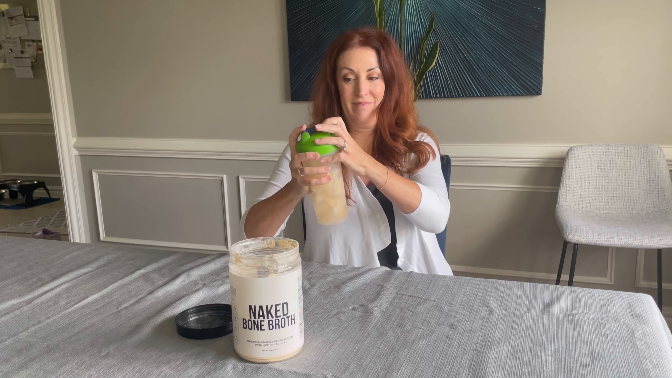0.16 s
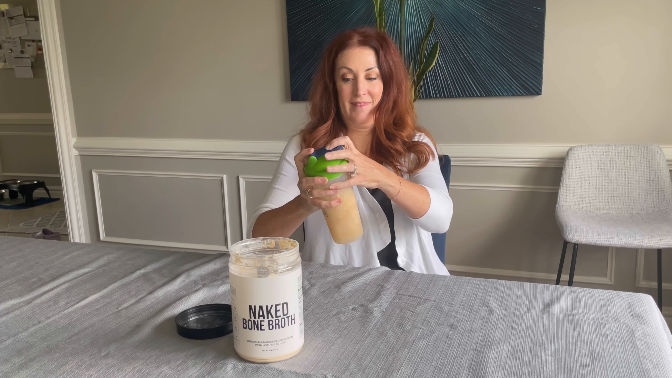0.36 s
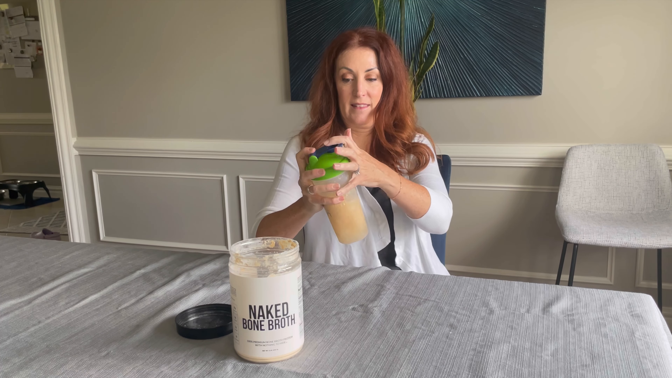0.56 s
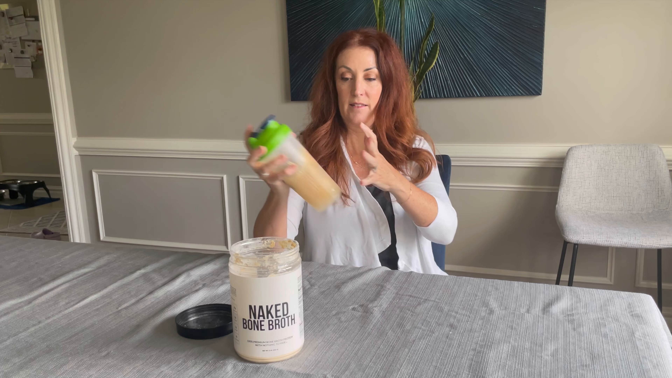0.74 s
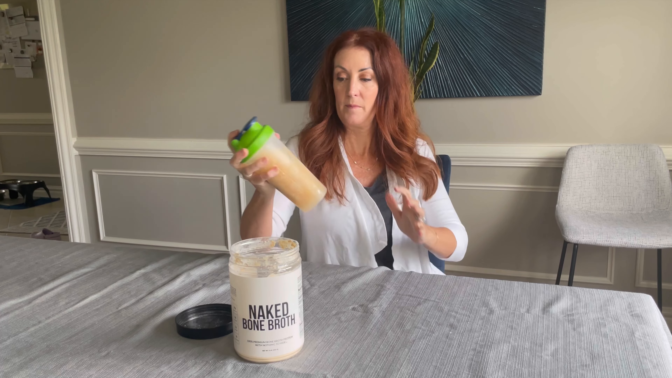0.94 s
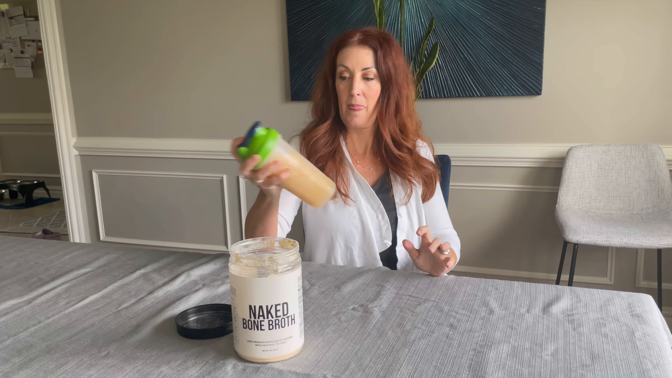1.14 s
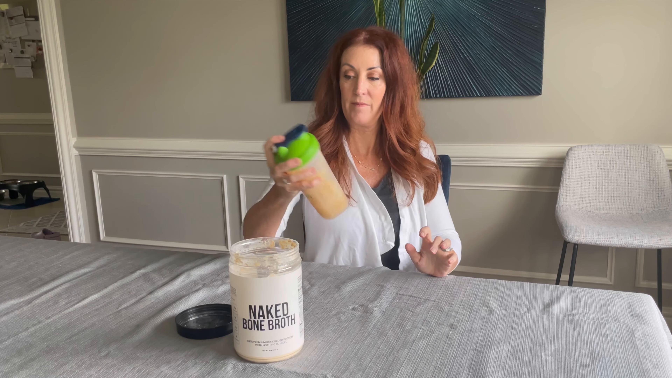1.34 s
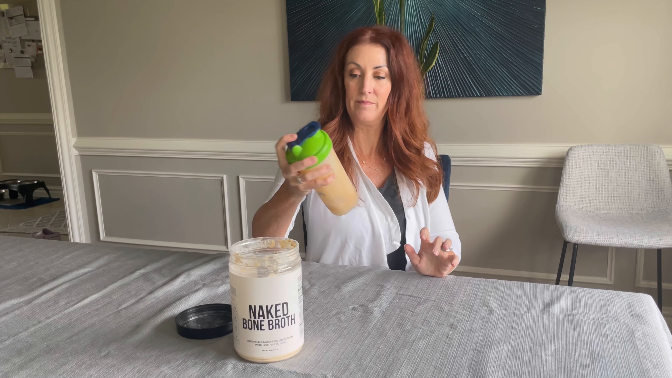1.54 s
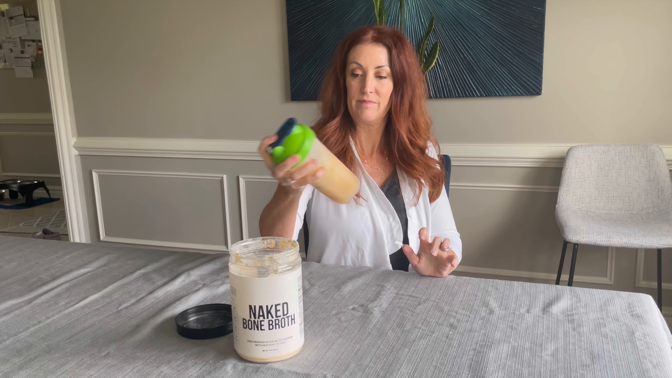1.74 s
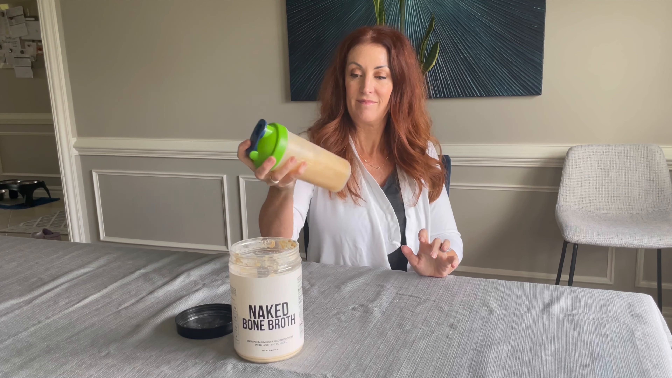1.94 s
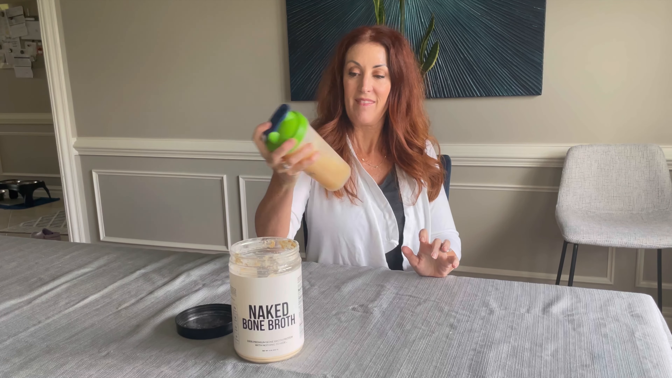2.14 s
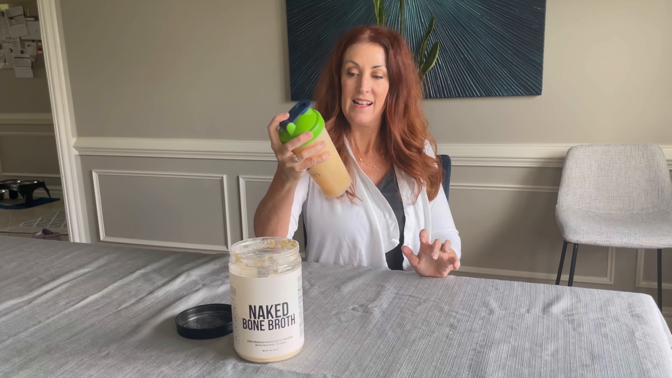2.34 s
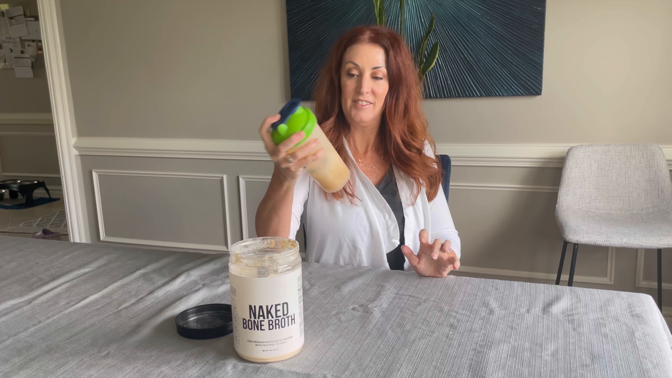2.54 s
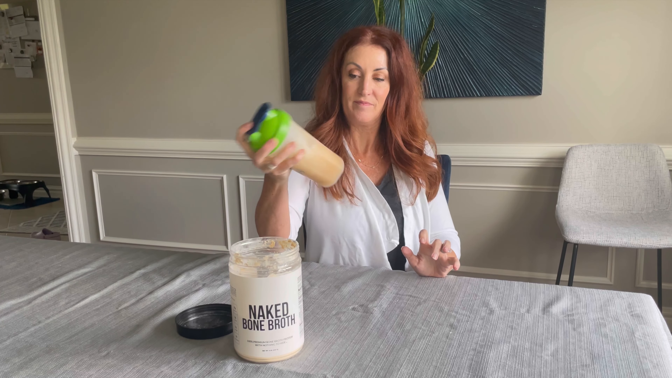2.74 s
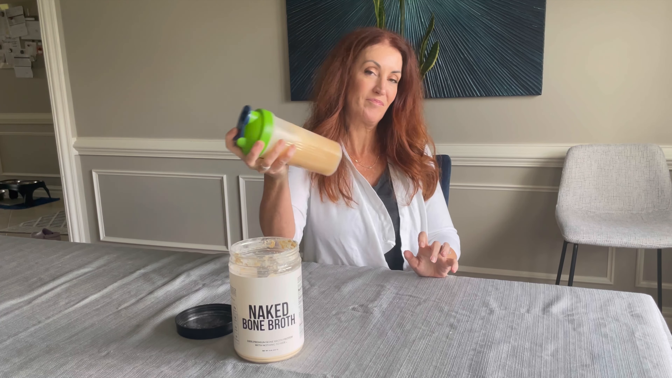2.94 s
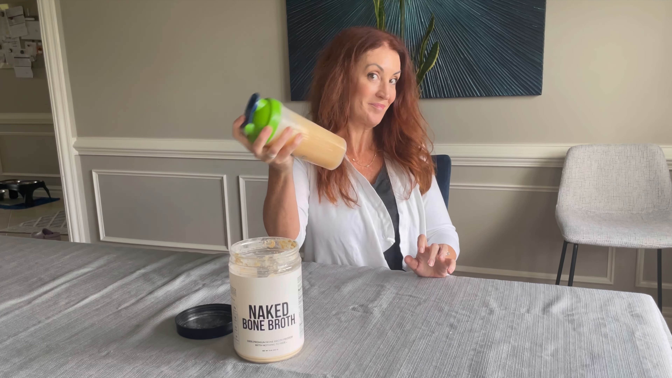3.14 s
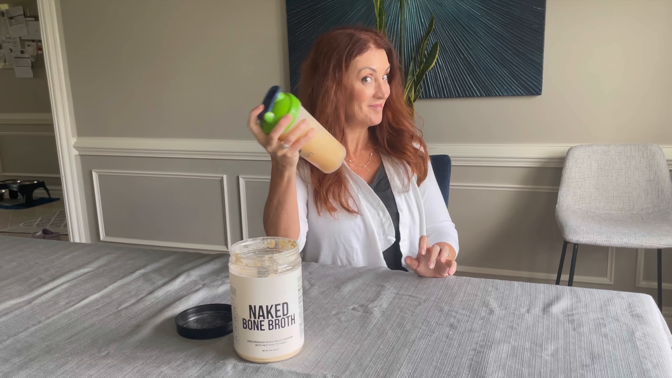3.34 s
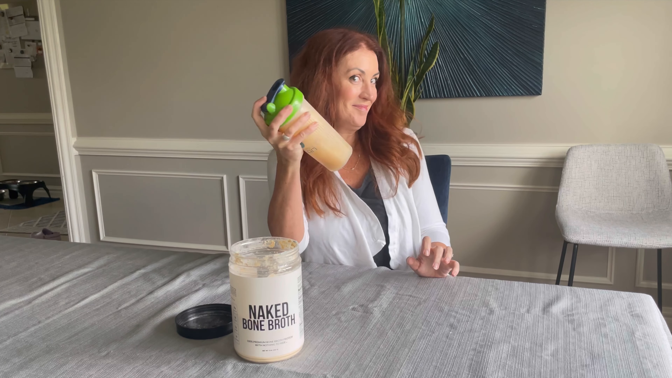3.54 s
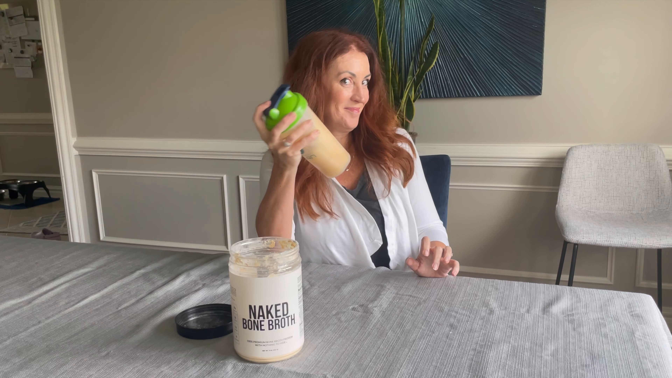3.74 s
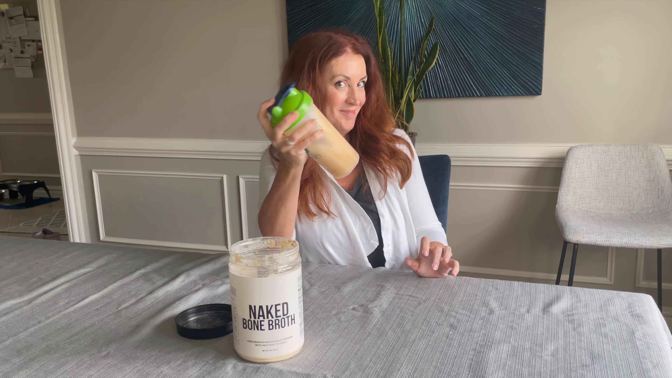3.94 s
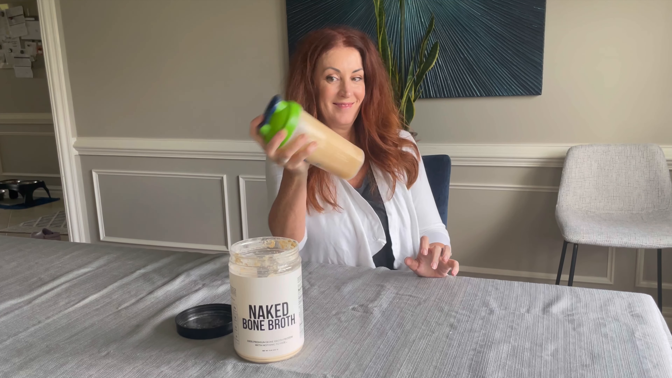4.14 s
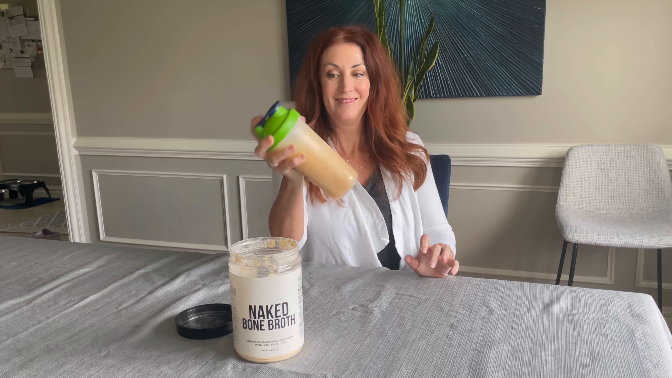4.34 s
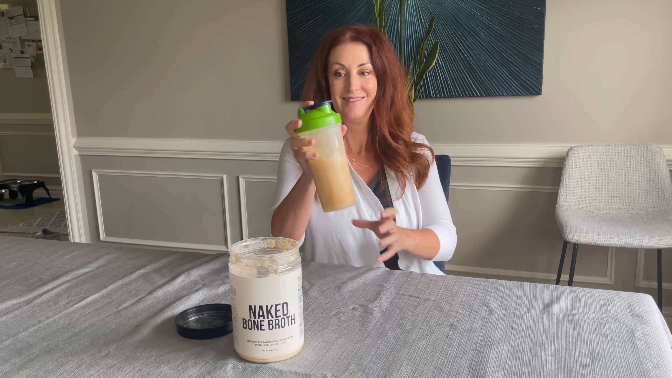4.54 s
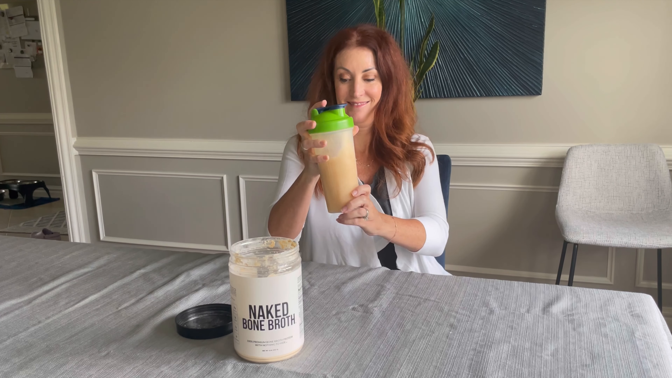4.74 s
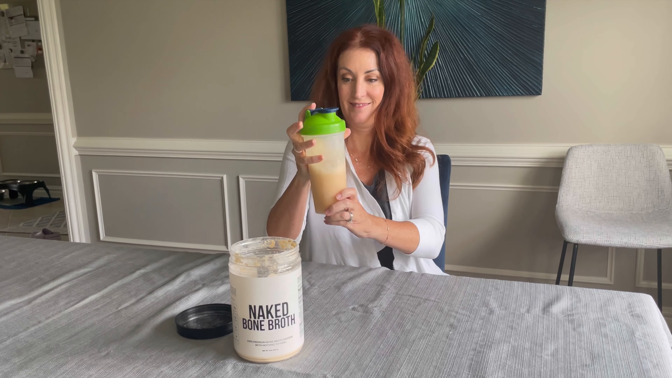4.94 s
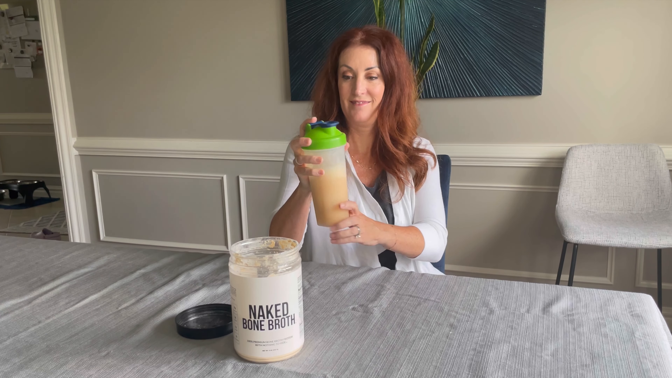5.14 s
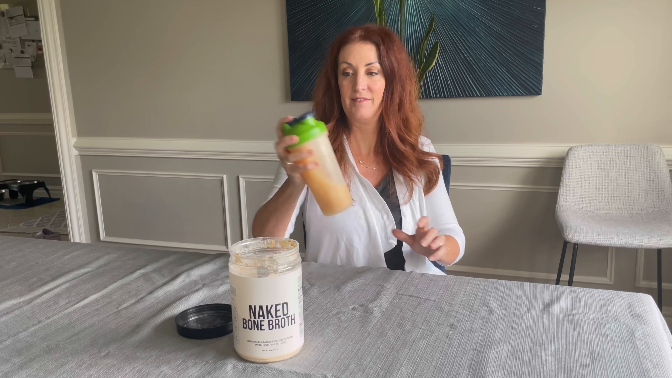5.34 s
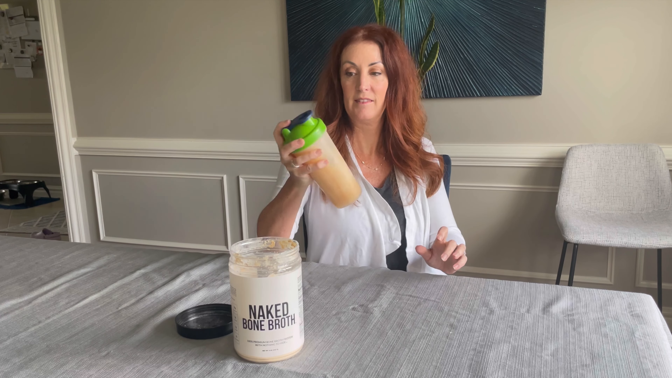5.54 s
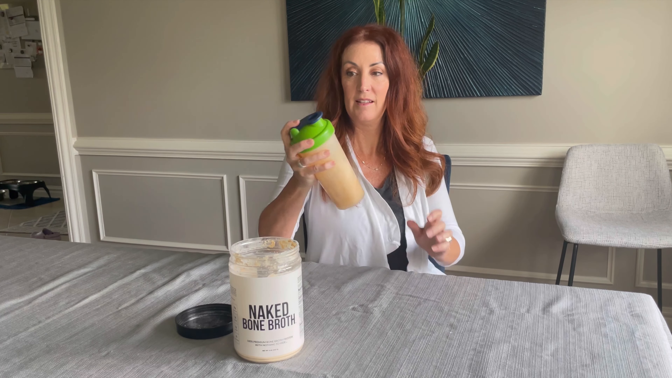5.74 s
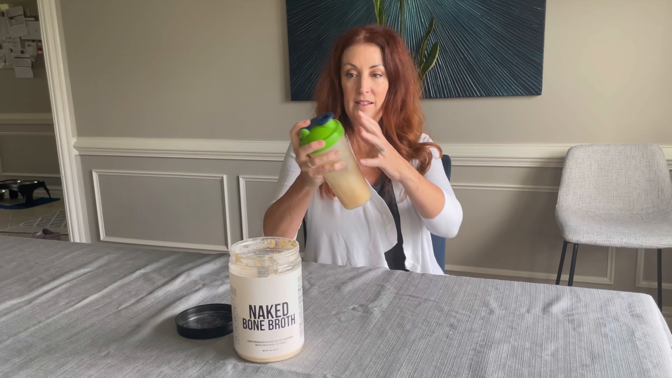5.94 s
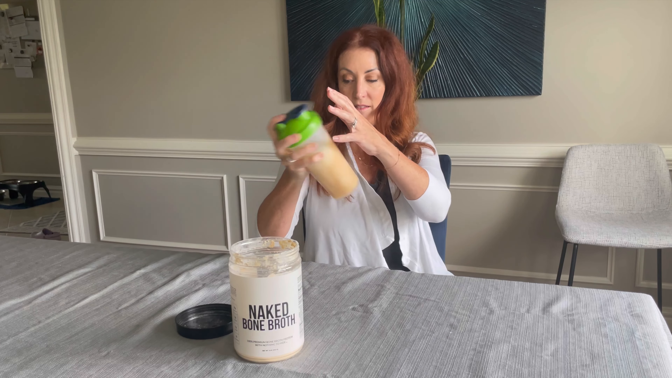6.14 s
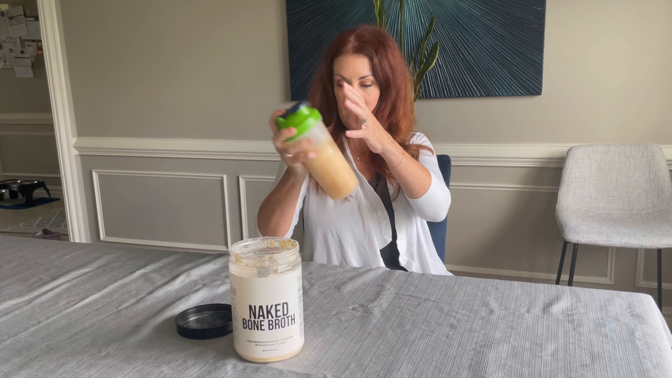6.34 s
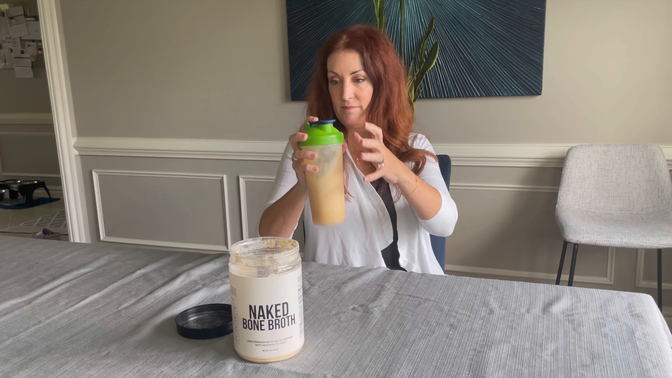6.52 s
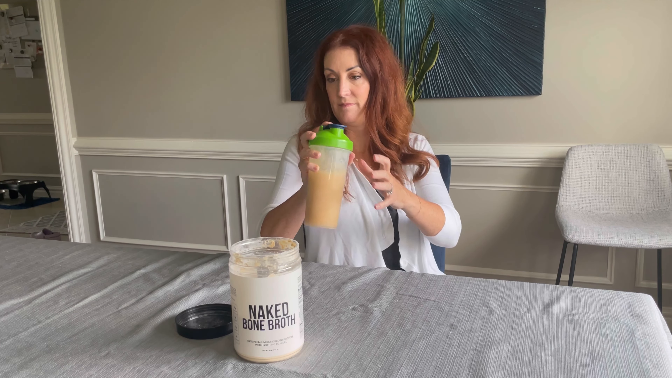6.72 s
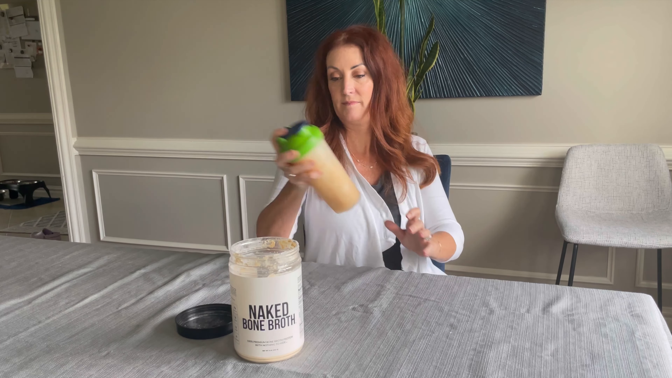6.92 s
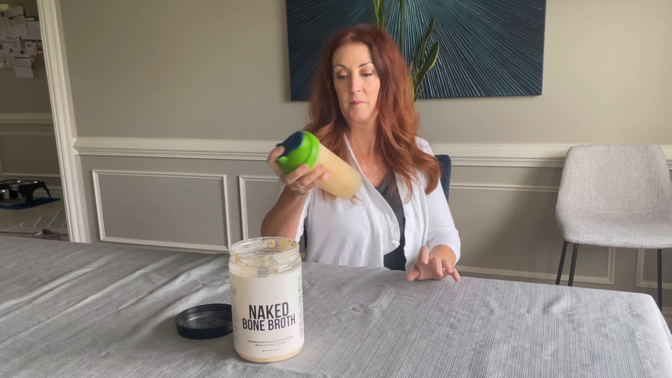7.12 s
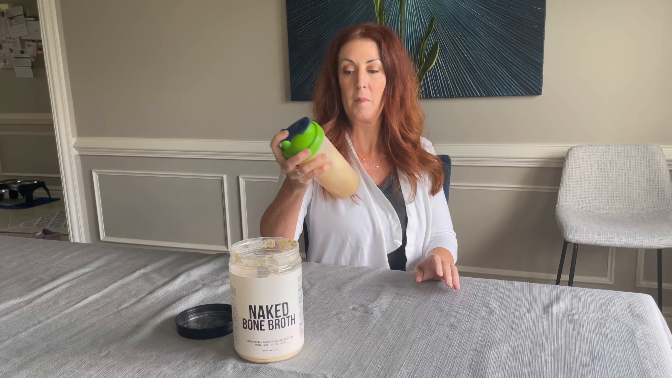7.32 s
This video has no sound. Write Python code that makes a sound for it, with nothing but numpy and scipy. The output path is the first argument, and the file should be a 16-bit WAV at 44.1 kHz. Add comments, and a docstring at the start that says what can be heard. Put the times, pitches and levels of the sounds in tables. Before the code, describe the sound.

Ice cubes rattle and knock inside a plastic bottle of sloshing liquid, shaken hard by hand in a room.

```python
"""Ice and liquid in a plastic bottle, shaken by hand in a living room, a metre from a phone's microphones.
Over a low ventilation rumble, a first burst of clatter cuts out at 0.41 s and the sound fades back in.
From about 1 s the shaking is steady: cubes knock the bottle wall for a few cycles and crack on each other,
the liquid sloshes and gurgles, and the room's hard walls throw every knock back. The shaking nearly rests
around 5 s, picks up again, eases, and ends in a last hard flurry at 7 s."""
import sys
import numpy as np
from scipy import signal
from scipy.fft import rfft, irfft, next_fast_len
from scipy.io import wavfile
from scipy.ndimage import uniform_filter1d

SR = 44100
rng = np.random.default_rng(int(sys.argv[2]) if len(sys.argv) > 2 else 0)


def digitize_waveform(pressure):
    """Quantize a signal to 16-bit integers and store it at the path in sys.argv[1].

    Rows of a 2-D input are taken as channels; values are limited to [-1, 1].
    """
    field = np.atleast_2d(pressure).T
    bounded = np.clip(field, -1, 1)
    quanta = np.round(bounded * 32767).astype(np.int16)
    wavfile.write(sys.argv[1], SR, quanta)


N = 325458
TIME = np.arange(N) / SR
FFT_SIZE = next_fast_len(N + SR) // 2 * 2
HZ = np.fft.rfftfreq(FFT_SIZE, 1 / SR)


def gain_of(db):
    """Decibels to an amplitude factor."""
    return 10 ** (np.asarray(db) / 20)


def unit_rms(x):
    """Scales x to rms 1."""
    return x / np.sqrt(np.mean(x ** 2) + 1e-20)


def curve_at(points, hz):
    """Reads a table on a log-frequency axis."""
    f, value = np.transpose(points)
    return np.interp(np.log(hz + 1), np.log(f + 1), value)


def coloured(x, spectrum):
    """Gives x a spectrum, at rms 1."""
    return unit_rms(irfft(rfft(x, FFT_SIZE) * gain_of(curve_at(spectrum, HZ)))[:N])


def clicks(per_s, spread_db):
    """Clicks at random moments, of random sign; a few are large."""
    size, sign, occurs = rng.random((N, 3)).T
    size_db = spread_db * np.minimum(-np.log(size + 1e-9), 4)
    return gain_of(size_db) * np.sign(sign - .5) * (occurs < per_s / SR)


def wander(step=2600):
    """A random drift at rms 1, with a new target every step samples."""
    targets = rng.standard_normal(N // step + 2)
    return unit_rms(np.interp(np.arange(N), np.arange(0, N + step, step), targets))


# Diffuse room sound at the two microphones: (frequency [Hz], left-right coherence [0-1])
COHERENCE = [(50, 0.87), (250, 0.82), (700, 0.02), (3000, 0.015), (9000, 0.026), (12000, 0.085),
             (14000, 0.34)]
def diffuse_pair(spectra):
    """Two unrelated spectra become a left-right pair, most alike in the bass."""
    left, other = spectra
    alike = np.clip(curve_at(COHERENCE, HZ), 0, 1)
    return np.array([left, alike * left + np.sqrt(1 - alike ** 2) * other])


# Room tone of the living room: (frequency [Hz], relative level [dB])
RUMBLE_SPECTRUM = [(15, -76.5), (25, -45), (49, 2), (74, 2), (92, -32), (114, -2.5), (217, -11.5),
                   (263, -7), (405, -14), (796, -26), (1940, -22), (2480, -77), (16000, -65)]
def ventilation(level_db=-54.5):
    """Steady low ventilation noise, arriving from all around."""
    noise = diffuse_pair(rfft(rng.standard_normal((2, N)), FFT_SIZE))
    rumble = irfft(noise * gain_of(curve_at(RUMBLE_SPECTRUM, HZ)))[:, :N]
    return gain_of(level_db) * unit_rms(rumble)


def low_bump(at_s=3.155, level_db=-39, hz=58, width_s=.022):
    """One soft bump, a few cycles of bass."""
    t = TIME - at_s
    return gain_of(level_db) * np.exp(-(t / width_s) ** 2) * np.sin(2 * np.pi * hz * t)


# Early reflections off the table and the walls: (delay [s], level [dB])
ECHOES = [(.0055, -7), (.0085, -11), (.021, -15)]
# Reverberation of the living room: (frequency [Hz], time to fall 60 dB [s])
ROOM_DECAY = [(300, 0.44), (1500, 0.51), (4000, 0.32), (9000, 0.21), (15000, 0.073)]
def room(x, places, tail_db=-5.5):
    """Direct sound, echoes and a sparse tail; each place of the moving bottle has its own reflections."""
    paths = 2 * places
    taps = np.zeros((paths, SR))
    at = np.arange(400, SR - 20, 20) + rng.integers(0, 20, (paths, (SR - 401) // 20))
    np.put_along_axis(taps, at, rng.choice([-1., 1.], at.shape), 1)
    hz, t, spectra = signal.stft(taps, SR, nperseg=256)
    decay = gain_of(-60 * t / curve_at(ROOM_DECAY, hz)[:, None])
    response = signal.istft(spectra * decay, SR, nperseg=256)[1]
    response *= gain_of(tail_db) / np.linalg.norm(response[0])
    for s, db in ECHOES:
        response[np.arange(paths), round(s * SR) + rng.integers(-30, 30, paths)] += gain_of(db)
    place = (np.arange(N) // 1000) % places  # the places take turns of 23 ms
    wet = sum(rfft(x * (place == k), FFT_SIZE) * rfft(response[2 * k:2 * k + 2], FFT_SIZE)
              for k in range(places))
    dulled = diffuse_pair(wet) / np.sqrt(1 + (HZ / 20000) ** 2)
    return x + irfft(dulled)[:, :N]


# The hand's shaking, first burst and the rest: (time [s], effort [dB], splash relative to effort [dB])
SHAKING = [
    [(0.0, -30.5, -17.5), (0.1, -37.5, -12), (0.41, -44.5, -16)],
    [(0.41, -46, -3), (0.62, -56, -24), (0.86, -45, -16), (1.05, -37.5, -3.5), (1.6, -38.5, -13),
     (1.8, -35, -9.5), (2.43, -35.5, -3), (3.21, -37.5, -9.5), (4.08, -36, -3.5), (4.45, -44.5, -2.5),
     (4.65, -53, -15), (4.95, -59, -14), (5.24, -64.5, -26), (5.33, -48, -22), (5.4, -51, -14),
     (5.415, -43, 4), (5.57, -37.5, -22), (5.73, -38, -4.5), (6.25, -42.5, -3), (6.6, -47.5, -5),
     (6.86, -52.5, -24), (6.93, -40.5, -23), (7.03, -53, 4), (7.09, -38.5, 7.5), (7.38, -35, -11.5)],
]
def shaking():
    """How hard the bottle is shaken and how brightly it splashes, in dB for every sample."""
    times, *columns = np.transpose(SHAKING[0] + SHAKING[1])
    return [np.interp(TIME, times, column) for column in columns]


def surge(blows, settle_s=.031, share=.31):
    """The contents surge after each blow and settle in the gaps: a swing of the effort in dB."""
    pole = np.exp(-1 / (settle_s * SR))
    power = signal.lfilter([1 - pole], [1, -pole], blows ** 2)
    power_db = np.maximum(10 * np.log10(power + 1e-9), -70)
    return share * (power_db - uniform_filter1d(power_db, SR // 2))


# The liquid, heard through the bottle wall: (frequency [Hz], relative level [dB])
SLOSH_SPECTRUM = [(350, -58), (600, -11.5), (1110, -4), (1800, 5.5), (2310, 0.5), (2780, 1), (3330, -2),
                  (5660, -19.5), (6000, -1), (7800, -65), (13200, -120)]
def slosh(effort_db):
    """A fizz whose resonances shift as the liquid runs along the bottle."""
    fizz = np.zeros(N)
    for shift in (.93, 1, 1.06):
        spectrum = np.multiply(SLOSH_SPECTRUM, [shift, 1])
        fizz += coloured(clicks(per_s=1200, spread_db=4.63), spectrum) * gain_of(3.8 * wander())
    return gain_of(effort_db - 2) * unit_rms(fizz)


# Droplets inside the bottle: (frequency [Hz], relative level [dB])
SPLASH_SPECTRUM = [(2000, -22.5), (3500, 0.5), (5500, -2), (7600, 0), (9000, -7), (10500, -19),
                   (13500, -13), (15600, -13)]
def splash(level_db):
    """Thousands of droplets a second merge into a bright hiss."""
    return gain_of(level_db) * coloured(clicks(per_s=4000, spread_db=5), SPLASH_SPECTRUM)


def bubble(hz):
    """A pocket of air rings for a few cycles, gliding upward."""
    t = np.arange(1200) / SR
    return np.sin(2 * np.pi * hz * t * (1 + 10 * t)) * np.exp(-t * hz / 4.9) * (1 - np.exp(-t / .0001))


def gurgle(effort_db):
    """Small bubbles of twelve sizes ring at random moments."""
    bubbles = sum(signal.oaconvolve(clicks(per_s=40, spread_db=3), bubble(hz))[:N]
                  for hz in np.geomspace(350, 900, 12))
    return gain_of(effort_db - 16) * unit_rms(bubbles)


# Glugs that stand out at a metre: (time [s], level [dB], pitch [Hz])
GLUGS = [(0.111, -52, 474), (1.064, -39.5, 620), (1.431, -37, 693), (1.978, -37, 475), (2.55, -33.5, 523),
         (2.948, -31.5, 523), (3.062, -35.5, 466), (3.102, -37.5, 677), (3.593, -39.5, 410),
         (4.354, -43, 485), (5.696, -37, 546), (5.763, -39, 438), (5.827, -35.5, 457), (7.0, -34.5, 482),
         (7.048, -37, 490), (7.193, -36.5, 371), (7.267, -44, 390)]
def glugs():
    """Single pockets of trapped air ring with a ragged level."""
    out = np.zeros(N + 1200)
    for s, db, hz in GLUGS:
        ragged = 1 + 2.5 * uniform_filter1d(rng.standard_normal(1200), size=40)
        out[round(s * SR):][:1200] += gain_of(db) * bubble(hz) * ragged
    return out[:N]


# Bursts of splashing liquid: (start [s], length [s], level [dB])
RUSHES = [(0.058, 0.094, -37.5), (1.702, 0.053, -30), (5.534, 0.12, -32.5), (5.626, 0.19, -39),
          (5.833, 0.074, -31.5), (7.062, 0.19, -29.5)]
# Their grains: (frequency [Hz], relative level [dB])
RUSH_SPECTRUM = [(1200, -25), (2300, -9), (2900, -4), (3800, -2.5), (4800, -12.5), (7500, -9), (9500, -32)]
def splash_bursts():
    """The liquid splashes in bursts: dense grains that swell fast and die away."""
    swell = np.zeros(N)
    for start, length, db in RUSHES:
        progress = np.clip((TIME - start) / length, 0, 1)
        swell += gain_of(db) * np.sin(np.pi * progress ** .4)
    return swell * coloured(clicks(per_s=4000, spread_db=2.3), RUSH_SPECTRUM)


# Dry cracks from inside the bottle: (time [s], level [dB])
CRACKS = [(0.0588, -33), (0.072, -19.5), (0.079, -26), (0.2706, -18), (0.298, -21), (0.3486, -27),
          (0.4775, -36), (0.5355, -45), (0.6115, -49), (0.675, -38), (0.7505, -27), (0.9597, -27),
          (1.1368, -29), (1.16, -23), (1.182, -15), (1.288, -19), (1.338, -17), (1.4626, -28), (1.566, -29),
          (1.67, -19), (1.828, -22), (1.9385, -18.5), (2.002, -17), (2.0865, -30), (2.142, -14),
          (2.2428, -36), (2.2715, -26), (2.3107, -11), (2.3875, -28), (2.563, -27), (2.648, -11.5),
          (2.747, -32), (2.819, -18), (2.9125, -19), (2.9228, -25), (2.9473, -12), (2.978, -27),
          (3.101, -17), (3.17, -16.5), (3.291, -22), (3.32, -27), (3.4481, -22), (3.4606, -16),
          (3.539, -9.5), (3.6043, -18), (3.634, -11), (3.687, -18), (3.809, -19), (3.8574, -15),
          (3.9822, -10), (4.061, -13), (4.09, -15), (4.1921, -10), (4.349, -16.5), (4.559, -25),
          (4.907, -43), (5.095, -52), (5.408, -20.5), (5.54, -11.5), (5.6135, -15), (5.6342, -15),
          (5.698, -16), (5.8186, -20), (5.999, -16), (6.054, -18), (6.1873, -20), (6.1984, -12),
          (6.363, -21), (6.4165, -27), (6.5915, -27), (6.6065, -33), (6.623, -24), (6.721, -37),
          (6.7675, -30), (6.882, -37), (6.924, -31), (6.944, -22), (7.009, -23), (7.0511, -5), (7.275, -14)]
def ice_cracks():
    """Ice hits ice: a wide snap of noise with a brief fizz after it."""
    out = np.zeros(N + 1500)
    t = np.arange(1500) / SR
    envelope = np.exp(-t / .00028) + gain_of(-28) * np.exp(-t / .032)
    for s, db in CRACKS:
        snap = rng.standard_normal(1500) * envelope
        out[round(s * SR):][:1500] += gain_of(db) * snap / abs(snap).max()
    return signal.sosfilt(signal.butter(1, [2000, 12500], "band", fs=SR, output="sos"), out)[:N]


# Modes of the plastic wall: (frequency [Hz], relative level [dB], time to fall 60 dB [s])
WALL_MODES = [(1299, 9, 0.033), (1780, 28.5, 0.0047), (2250, 26.5, 0.0064), (2700, 27.5, 0.0084),
              (3728, 22, 0.011), (4015, 26.5, 0.0088)]
def knock(blow_db, patch_hz, spray_db, chance, hard_db=-16, rebound_db=-14):
    """One blow: wall modes near the struck patch's pitch ring most, the cube rebounds, spray hisses."""
    lasting = min(gain_of(.2 * (blow_db - hard_db)), 1)  # soft taps die sooner
    t = np.arange(400) / SR
    ring = np.zeros(len(t))
    for (hz, db, t60), detune in zip(WALL_MODES, chance):
        off_pitch_db = -28 * lasting * abs(np.log2(hz / patch_hz))
        envelope = gain_of(db + off_pitch_db - 60 * t / t60 / lasting)
        ring += envelope * np.sin(2 * np.pi * hz * (1 + .04 * (detune - .5)) * t)
    ring *= 1 - np.exp(-(t / .00055) ** 2)  # the contact builds up
    rebound_s = .004 + .046 * chance[8:20] ** 1.5
    rebound_size = gain_of(rebound_db - 200 * rebound_s) * 2 * (chance[20:32] - .5)
    contacts = np.zeros(2600)
    contacts[0] = 1
    contacts[(rebound_s * SR).astype(int)] = rebound_size
    blow = np.convolve(ring / abs(ring).max(), contacts)
    spray_band = signal.butter(2, [3900, 8600], "band", fs=SR, output="sos")
    spray = unit_rms(signal.sosfilt(spray_band, rng.standard_normal(len(blow))))
    spurts = gain_of(-5) * np.convolve(np.exp(-t / .001), abs(contacts))
    trail = gain_of(-19) * np.exp(-np.arange(len(blow)) / SR / .022)
    return blow + gain_of(spray_db) * spray * (spurts + trail)


def clatter(effort_db, cubes=12):
    """Small cubes tick everywhere on the wall, as hard as the shaking."""
    out = np.zeros(N)
    for chance in rng.random((cubes, 33)):
        hits = clicks(per_s=14, spread_db=4)
        tick = knock(blow_db=-30, patch_hz=1400 * 4.5 ** chance[32], spray_db=0, chance=chance)
        out += signal.oaconvolve(hits, tick)[:N]
    return gain_of(effort_db - 13) * unit_rms(out)


# Foreground knocks at a metre: (time [s], level [dB], patch pitch [Hz], spray relative to knock [dB])
KNOCKS = [(0.077, -37, 2490, 9), (0.0993, -28, 1920, -9), (0.1095, -14.5, 1660, -26),
          (0.2138, -27, 2150, -1), (0.293, -23, 1870, -5), (0.2975, -34, 2200, -16),
          (0.349, -20, 1860, -6.5), (0.4326, -49, 2190, 6), (0.476, -41, 2090, -6),
          (0.5353, -28, 2000, -31), (0.644, -34, 2060, -23), (0.6752, -29.5, 3200, -8),
          (0.805, -40, 1890, 5), (0.8262, -41, 1760, 12), (0.85, -29, 2700, -12), (0.904, -22.5, 1890, -10),
          (0.9334, -20.5, 2260, -8), (0.9984, -24, 2220, 5.5), (1.1834, -15, 2490, -1.5),
          (1.188, -20, 2600, -15), (1.338, -19, 1940, -3.5), (1.432, -18.5, 1950, -25),
          (1.458, -23, 1900, -13), (1.4875, -20, 1960, -5), (1.521, -23, 1760, -0.5),
          (1.5663, -20.5, 2080, -3.5), (1.613, -18.5, 1870, -8), (1.6361, -22, 1610, -4),
          (1.6733, -4.5, 2520, -4), (1.686, -9, 2670, -21), (1.7945, -18, 1700, -7),
          (1.828, -20.5, 2100, 3), (1.843, -16, 2700, -31.5), (1.861, -20, 2700, -14),
          (1.882, -14.5, 2300, -9), (1.942, -12.5, 1920, -3), (2.003, -8.5, 2380, -16),
          (2.0459, -18, 1770, -30), (2.1137, -21.5, 2130, 6.5), (2.244, -17, 1830, -1.5),
          (2.255, -17.5, 2120, -6), (2.29, -17.5, 1780, -1.5), (2.309, -17, 1740, -6),
          (2.311, -15, 2750, -7), (2.327, -14.5, 2750, -22), (2.351, -23, 2860, -9),
          (2.398, -16.5, 2400, 0.5), (2.4405, -15.5, 1720, -2), (2.4851, -16.5, 2710, -3),
          (2.514, -12.5, 2700, -22), (2.518, -25, 2700, -20), (2.5695, -17.5, 1900, 0.5),
          (2.581, -18, 2250, -10), (2.6036, -18, 1580, -1), (2.66, -19.5, 2720, -24),
          (2.677, -17, 2210, -4), (2.7479, -12.5, 2060, -4), (2.7967, -20, 1550, -4),
          (2.816, -24, 2250, -1), (2.8369, -6, 2550, -17), (2.912, -16, 2250, 1.5),
          (2.924, -15.5, 1750, -28), (2.9764, -19.5, 3070, 3.5), (2.9853, -19, 1720, -10),
          (3.0096, -17.5, 2770, -21), (3.05, -17.5, 1840, -6), (3.1016, -14, 1660, -2),
          (3.1192, -20, 1700, -8), (3.1871, -11.5, 2680, -12), (3.292, -20, 1430, 0),
          (3.319, -18, 1960, -2.5), (3.328, -18.5, 1630, -16), (3.359, -14.5, 2680, -10),
          (3.3873, -16, 1760, -11), (3.462, -16.5, 1540, -3), (3.5396, -20, 2450, 0.5),
          (3.607, -20, 1780, -4), (3.632, -18.5, 1960, 0), (3.684, -23.5, 1900, 7.5),
          (3.7551, -14.5, 1720, -31), (3.859, -12.5, 2590, -1.5), (3.8666, -12, 2700, -1),
          (3.9, -15, 2720, -28), (3.927, -14.5, 2820, -10), (3.9826, -17, 1970, -3), (4.0052, -20, 1750, 0),
          (4.0253, -17.5, 1630, 0.5), (4.0859, -21.5, 2500, 3), (4.141, -20, 1920, 1),
          (4.1756, -22.5, 3000, -5), (4.2482, -20.5, 2000, -29), (4.3518, -19.5, 2050, -6),
          (4.377, -36, 1780, -5), (4.539, -34, 1890, -22), (4.5572, -23, 2570, 0),
          (4.6003, -23.5, 2120, -2), (4.653, -32, 2200, -5), (4.6995, -38, 3700, -7),
          (4.731, -32.5, 2370, -2.5), (4.748, -46, 1660, -15), (4.81, -45, 2520, -12),
          (4.855, -40, 2320, -6), (4.892, -38, 1720, -3), (4.908, -35.5, 2880, -1),
          (4.9435, -36.5, 2250, -6), (5.01, -48, 1960, -22), (5.0778, -53, 2500, -20),
          (5.095, -39.5, 2800, -3.5), (5.2776, -39, 1800, -37), (5.3028, -37, 1860, -5),
          (5.334, -29, 1860, -6.5), (5.4102, -21.5, 2040, -1.5), (5.4252, -21, 2450, -11),
          (5.5275, -17, 2750, -10), (5.538, -10.5, 2900, -15), (5.6405, -16, 3030, 0),
          (5.673, -19, 1840, -4), (5.71, -14, 3140, -7), (5.8214, -16, 2060, 1), (5.8437, -17, 1880, -22),
          (5.899, -16.5, 3350, -2), (5.915, -18, 3130, -2), (5.9986, -19.5, 2240, 2),
          (6.054, -23.5, 2250, 0), (6.1458, -23, 2600, -19), (6.1863, -23, 1950, 6.5),
          (6.2504, -20.5, 2170, -4), (6.268, -23.5, 2580, -12), (6.33, -22, 1640, -7),
          (6.364, -26.5, 2060, 2.5), (6.4126, -28, 2930, 3), (6.4935, -27, 2740, -1),
          (6.609, -32, 2040, -18), (6.6565, -34, 2110, 1), (6.721, -33, 1840, -31),
          (6.746, -32.5, 2700, -0.5), (6.7667, -38, 2600, -3), (6.881, -39, 1860, 1),
          (6.9234, -32.5, 2740, 0.5), (6.945, -26, 2300, -0.5), (7.001, -22.5, 1790, -5),
          (7.0278, -24.5, 2030, -10), (7.049, -21, 1740, 12), (7.078, -17.5, 1780, -7),
          (7.091, -17, 2540, -13), (7.112, -8.5, 3070, -16), (7.1298, -14, 2930, -2.5),
          (7.262, -17.5, 2070, -1), (7.278, -21, 2210, -5), (7.323, -19, 2850, -3)]
def cube_knocks():
    """Cubes thrown against the bottle wall, one clear blow at a time."""
    out = np.zeros(N + 3000)
    for (s, db, hz, spray_db), chance in zip(KNOCKS, rng.random((len(KNOCKS), 32))):
        blow = knock(db, hz, spray_db, chance)
        out[round(s * SR):][:len(blow)] += gain_of(db) * blow
    return signal.sosfilt(signal.butter(2, 700, "high", fs=SR, output="sos"), out)[:N]


def scene(cut_s=.411, fade_in_s=.022):
    """The bottle in the room; at cut_s everything stops, echoes too, and fades back in."""
    effort_db, splash_db = shaking()
    blows = cube_knocks()
    effort_db = effort_db + surge(blows)
    ice = blows + ice_cracks() + clatter(effort_db)
    liquid = slosh(effort_db) + splash(effort_db + splash_db) + gurgle(effort_db) + glugs()
    bottle = ice + liquid + splash_bursts()
    before = np.clip((cut_s - TIME) * SR / 60, 0, 1)  # closes in 60 samples
    after = np.clip((TIME - cut_s) / fade_in_s, 0, 1) ** 2
    first_burst = before * room(bottle, places=1)
    long_shake = after * room(bottle * (before == 0), places=4)
    return first_burst + long_shake + np.maximum(before, after) * ventilation() + low_bump()


# Notches of the phone's microphone housing: (frequency [Hz], width [Hz], gain [dB])
HOUSING_NOTCHES = [(6150, 300, -7), (8300, 400, -6)]
# Balance of the two microphone ports: (frequency [Hz], left minus right [dB])
PORT_BALANCE = [(60, -2), (110, 2), (1290, 1), (4400, 1.5), (8120, 1.5), (15000, -.5)]
# Delay between the ports: (frequency [Hz], phase lead of the left [rad])
PORT_LEAD = [(0, 0), (1000, .3), (3000, 1.5), (5000, 1.9), (9000, 2.6), (11600, 2.2), (12600, .6),
             (13900, 0)]
def record(dry, band_limit_hz=15850):
    """The phone a metre away: two ports with their delay, balance and notches, then a band limit."""
    housing_db = sum(db * np.exp(-((HZ - hz) / width) ** 2) for hz, width, db in HOUSING_NOTCHES)
    side = np.array([[.5], [-.5]])  # left, right
    port_gain = gain_of(housing_db + side * curve_at(PORT_BALANCE, HZ))
    port_phase = np.exp(1j * side * curve_at(PORT_LEAD, HZ))
    heard = irfft(rfft(dry, FFT_SIZE) * port_gain * port_phase)[:, :N]
    heard = np.tanh(heard)  # the input saturates softly on the hardest blows
    lowpass = signal.firwin(511, band_limit_hz, window=("kaiser", 9), fs=SR)
    return signal.oaconvolve(heard, lowpass[None], "same")


dry = scene()
out = record(dry)
digitize_waveform(out)
```